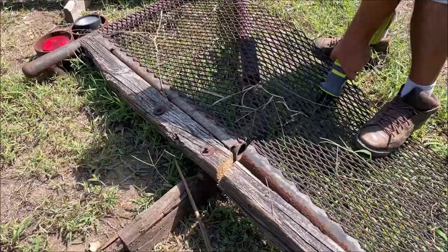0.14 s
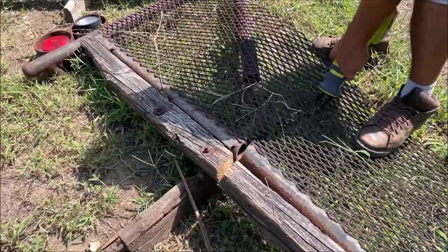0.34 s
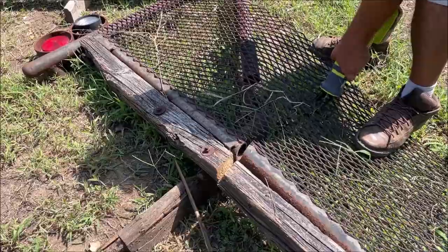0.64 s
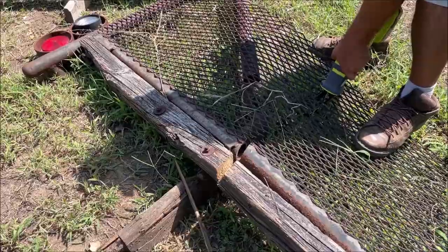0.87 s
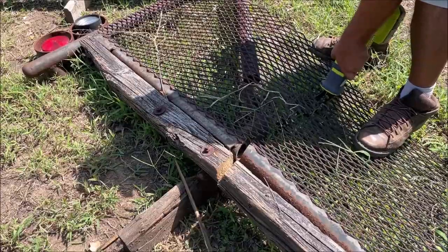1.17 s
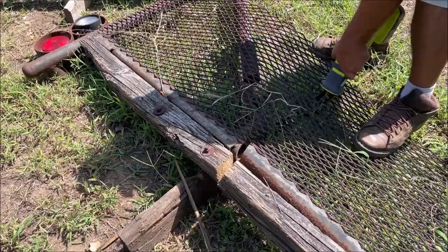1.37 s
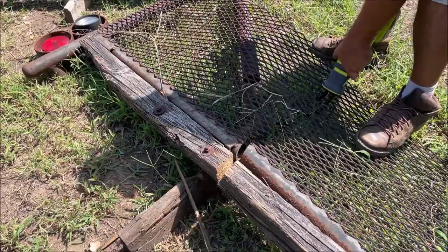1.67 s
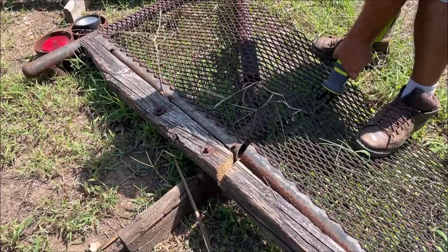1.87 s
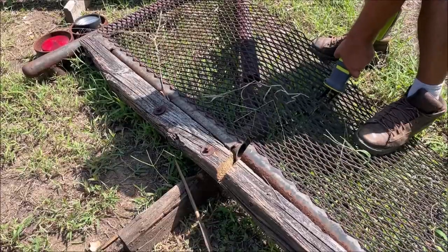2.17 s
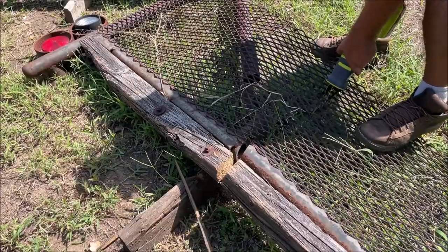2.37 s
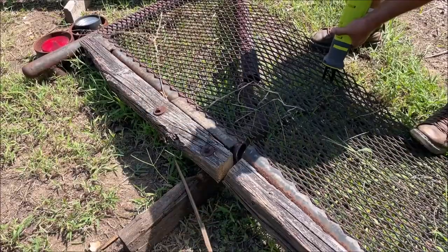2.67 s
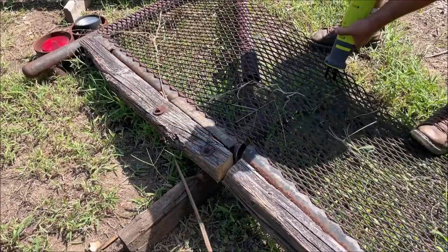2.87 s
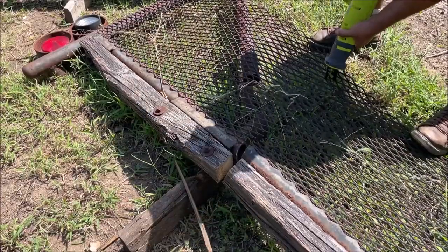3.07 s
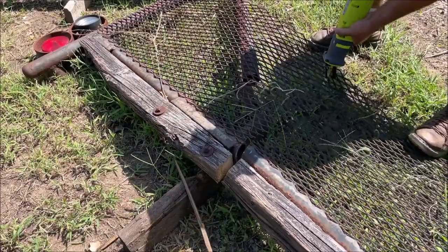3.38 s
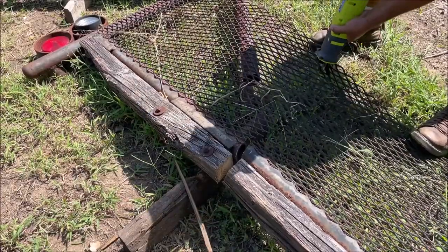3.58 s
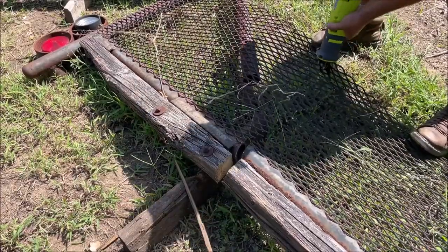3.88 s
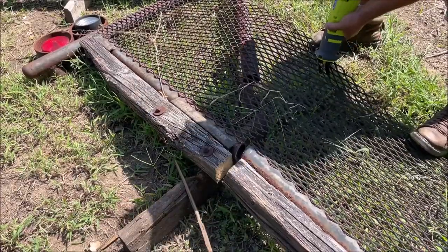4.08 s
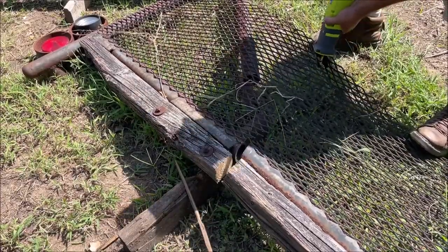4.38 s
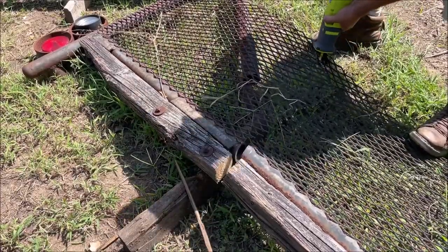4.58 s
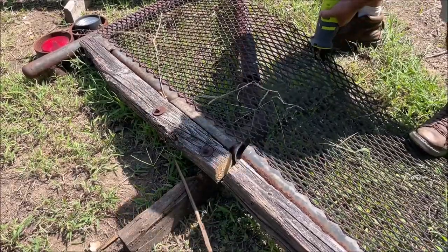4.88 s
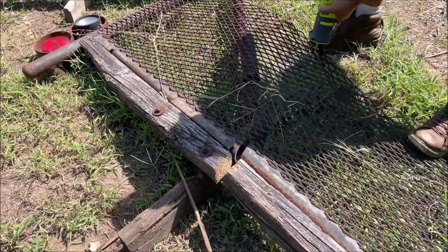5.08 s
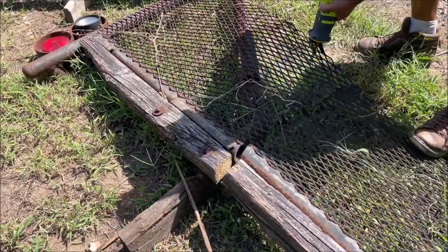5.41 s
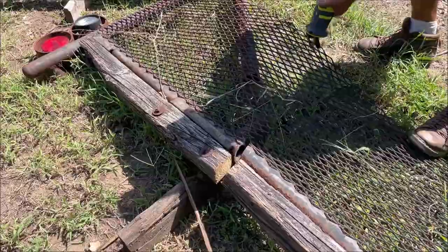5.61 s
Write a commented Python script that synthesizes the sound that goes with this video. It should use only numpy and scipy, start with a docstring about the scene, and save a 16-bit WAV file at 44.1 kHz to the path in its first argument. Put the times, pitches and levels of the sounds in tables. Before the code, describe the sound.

Harsh buzzing power saw cutting a metal gate outdoors, with ringing pipe barks, two short gaps, a clacking stumble and wavering blade squeals.

```python
"""Reciprocating saw on a steel gate

A cordless saw cuts a steel pipe of a mesh gate: filtered noise impacts rasp in time with the strokes.
The pipe barks in short sagging tones, the blade squeals in wavering tones, the shoe clacks in noise bursts.
Stroke harmonics and ringing resonances make the gate hum, rattle and bump on its timber, over faint air.
The first two stretches end in a run-down; after a hard bite and a clacking stumble it cuts on faster."""
import sys
import numpy as np
from scipy import signal
from scipy.fft import rfft, irfft
from scipy.io import wavfile
from scipy.ndimage import uniform_filter1d

SR = 44100
rng = np.random.default_rng(int(sys.argv[2]) if len(sys.argv) > 2 else 0)


def wrap_up_sound(samples):
    """Save the sound to the file named by the first command line argument, as 16-bit audio."""
    columns = np.atleast_2d(samples).T
    # keep every value between -1 and 1, then stretch to whole-number steps
    tamed = np.clip(columns, -1, 1)
    steps = np.round(tamed * 32767).astype(np.int16)
    wavfile.write(sys.argv[1], SR, steps)


N = 253519

T = np.arange(N) / SR  # s
FREQ = np.maximum(np.arange(N // 2 + 1) * SR / N, 1)  # Hz, kept above zero for the logarithms

# run-down after a stretch of sawing: time constant of the speed, then falls in level
COAST_S, RASP_FALL_DB_PER_S, GATE_FALL_DB_PER_S, GRIT_FALL_DB_PER_S = .3, 165, 111, 40
# fine grit and pipe ring relative to the rasp, low shaking relative to the rattle
GRIT_DB, RING_DB, SHAKE_DB = -7, -1, -8
# a bound blade rasps and rings more and holds the gate still: width of each strain, then dB per unit of it
STRAIN_S, STRAIN_RASP_DB, STRAIN_RING_DB, STRAIN_GRIT_DB, STRAIN_SHAKE_DB = 0.026, 1.15, 4, 0.5, -3
RING_MAX_DB = -30.5  # cap on the scraping's drive of the pipe, before strain adds to it


# One curve per stretch of sawing, the second coming back abruptly:
# [t/s, feed pressure as rasp level/dB, shaking of the gate level/dB]
STRETCHES = [
    [(0, -30, -29), (.48, -26.5, -34), (.68, -30.5, -35.5), (.95, -32, -37.5), (1.15, -30.5, -37),
     (1.45, -29.5, -39.5), (1.87, -30.5, -32), (2.05, -26, -28.5), (2.13, -30.5, -32), (2.27, -27, -31.5)],
    [(2.581, -33.5, -38), (2.75, -33, -37), (2.87, -25, -28.5), (3.03, -25.5, -30), (3.205, -24, -28.5)],
    [(3.3, -37, -35), (3.375, -41, -41), (3.48, -38, -35)],
    [(3.486, -33, -31.5), (3.61, -35, -36), (3.76, -27, -34.5), (3.95, -31.5, -34), (4.15, -28, -34.5),
     (4.23, -32, -36), (4.33, -28, -37.5), (4.66, -32, -35.5), (4.8, -29, -34.5), (5, -29, -37),
     (5.11, -31.5, -35.5), (5.53, -27, -34), (5.75, -32, -36)],
]


def sawing():
    """Rasp level, gate level and seconds of coasting; each stretch takes over from the one before."""
    state = np.zeros((3, N))
    for k, stretch in enumerate(STRETCHES):
        rasp_db, gate_db = curve(stretch)
        coast = np.maximum(T - stretch[-1][0], 0)
        rasp_db = rasp_db - RASP_FALL_DB_PER_S * coast
        gate_db = gate_db - GATE_FALL_DB_PER_S * coast
        begun = (T >= stretch[0][0]) | (k == 0)
        state = np.where(begun, [rasp_db, gate_db, coast], state)
    return state


# Stroke rate under power: [t/s, f/Hz (strokes per second)]
SPEED = [(0, 32.3), (.4, 33.2), (.65, 33.6), (.8, 34.2), (.93, 38.7), (1.2, 39.2), (1.31, 41.7),
         (1.54, 41.8), (1.69, 35), (1.85, 33.5), (1.915, 30.5), (1.97, 33.7), (2.05, 34), (2.27, 33.8),
         (2.58, 44), (2.77, 44), (2.92, 38), (3.17, 40.5), (3.35, 22), (3.5, 32), (3.75, 43.1),
         (4.15, 43.6), (5.1, 43.4), (5.4, 41.8), (5.75, 42)]


def stroke_rate(coast):
    """Strokes per second: the powered rate, spinning down exponentially while the saw coasts."""
    return curve(SPEED)[0] * np.exp(-coast / COAST_S)


def crank(motor, catches):
    """Stroke count of the blade, which slips against the motor so that its teeth catch at whole numbers."""
    times = catches[:, 0]
    slip = np.unwrap(2 * np.pi * (np.interp(times, T, motor) % 1)) / (2 * np.pi)
    return motor - np.interp(T, times, slip)


def bite(turns, pull_db, return_db, uneven_db, lead=0.244):
    """Force of the teeth: a level ramp per stroke and half stroke, falling for positive dB, else rising."""
    pull = (turns + lead) % 1
    either_way = (2 * (turns + lead)) % 1
    force_db = uniform_filter1d(-pull_db * pull - return_db * either_way, size=44)  # 1 ms smoothing
    return unit(undb(force_db + uneven_db * walk(110)))


def strain(catches, full_db=-12):
    """How hard the blade is bound: it builds up where strong catches crowd together, 0 when it runs free."""
    return sum(undb(db - full_db) * swell(s, STRAIN_S) for s, db, hz in catches)


# Tooth noise, relative spectrum: [f/Hz, level per Hz/dB]
RASP = [(700, -25), (1100, -7), (1700, -2), (2100, -2.8), (3000, -5), (3900, -6.8), (4700, -7),
        (6100, -10.8), (7400, -6.3), (9200, -11.2), (10500, -8.8), (13000, -14.5), (15600, -17)]
# Higher resonances of the pipe wall: [f/Hz, width/Hz, level/dB]
WALL = [(1875, 97, 3), (2180, 110, -32), (2319, 31, 8), (2465, 14, 8.5), (2820, 26, -26), (2890, 20, 9.5),
        (3110, 93, 5), (3267, 40, 3.5), (3574, 120, -2.5), (3776, 67, -1.5), (3880, 150, -2.5),
        (4520, 19, 9.5), (4620, 430, -2), (4876, 29, 6.5), (5180, 43, 2), (5300, 25, -18)]


def teeth(turns, rasp_db, grit_db):
    """Teeth tear chips from the steel and ring the wall; sharper contact adds fine grit at the top."""
    chips = colour(steel(impacts(spread=0.69)), RASP)
    wall = resonate(impacts(spread=3.1), WALL)
    snapping = chipping(per_s=260, decay_s=0.0023, burst_db=-2.0)
    rasp = unit(chips + undb(-6.0) * wall) * snapping
    grit = irfft(rfft(rasp) / (1 + (8000 / FREQ) ** 8), N)  # the part above about 8 kHz
    body_bite = bite(turns, pull_db=-0.7, return_db=-2.0, uneven_db=0.37)
    grit_bite = bite(turns, pull_db=2.5, return_db=2.0, uneven_db=1.4)
    body = (rasp - grit) * body_bite * undb(rasp_db + 0.63)
    return body + unit(grit) * grit_bite * undb(rasp_db + grit_db + 3.0)


def chipping(per_s, decay_s, burst_db):
    """Chips snap off at random: each lifts the noise at once and dies away in a few milliseconds."""
    snaps = (rng.random(N) < per_s / SR) * rng.exponential(size=N)
    bursts = signal.lfilter([1], [1, -np.exp(-1 / (decay_s * SR))], snaps)
    return unit(np.sqrt(1 + undb(burst_db) ** 2 * bursts))


# The teeth catch and the pipe barks: [t/s, peak level/dB, f/Hz]
BARKS = [(.005, -14.5, 1265), (.036, -12, 1212), (.068, -11, 1256), (.098, -17.5, 1261), (.128, -15, 1204),
         (0.159, -18, 1278), (0.192, -18.5, 1295), (.225, -14, 1238), (.254, -12, 1219), (.284, -12, 1270),
         (.314, -12, 1179), (0.343, -9.5, 1170), (.373, -13, 1201), (.404, -15, 1240), (.434, -11.5, 1196),
         (.465, -15, 1136), (.493, -13, 1200), (.526, -10.5, 1248), (.561, -18, 1244), (.590, -17.5, 1150),
         (.621, -16.5, 1174), (.742, -18, 1257), (0.772, -16, 1260), (.801, -17.5, 1275),
         (0.831, -20, 1256), (.860, -18.5, 1221), (.887, -15.5, 1250), (.991, -15, 1249),
         (1.149, -20, 1290), (1.200, -18, 1247), (1.223, -16, 1162), (1.249, -15, 1282), (1.297, -17, 1213),
         (1.321, -13.5, 1230), (1.346, -14, 1213), (1.37, -13.5, 1182), (1.44, -15, 1260),
         (1.463, -12.5, 1225), (1.535, -13, 1227), (1.560, -11.5, 1240), (1.585, -11, 1228),
         (1.747, -16.5, 1240), (1.824, -18, 1304), (1.900, -12, 1250), (1.933, -14, 1270),
         (1.962, -17, 1315), (2.148, -19, 1220), (2.792, -21, 1250), (2.974, -12.5, 1233),
         (3.002, -15.5, 1229), (3.028, -12.5, 1228), (3.051, -13, 1248), (3.101, -14, 1180),
         (3.125, -10.5, 1180), (3.152, -16.5, 1273), (4.467, -20, 1237), (4.564, -17.5, 1256),
         (4.587, -17, 1285), (4.716, -17.5, 1253), (4.814, -19, 1266), (4.835, -15, 1110),
         (4.928, -18.5, 1245), (4.953, -17, 1314), (4.975, -16, 1236), (4.998, -12, 1234),
         (5.022, -17, 1295), (5.045, -19, 1147), (5.496, -19, 1240), (5.576, -13.5, 1336)]


def barks(catches, width_s=0.0034, skirt_s=.008, skirt_db=-17, waver_hz=20, sag_hz_per_s=3000,
          overtone_db=-19, rebound_s=0.013, rebound_db=-20):
    """Caught teeth chatter at the pipe's main resonance, sag in pitch, break free and catch again lightly."""
    out, waver = np.zeros(N), waver_hz * walk(400)
    for (s, db, hz), start in zip(catches, rng.random(len(catches))):
        near = np.abs(T - s) < 3 * skirt_s
        age = T[near] - s
        pitch = hz - sag_hz_per_s * age + waver[near]
        phase = 2 * np.pi * (start + np.cumsum(pitch) / SR)
        shape = np.exp(-(age / width_s) ** 2) + undb(skirt_db) * np.exp(-(age / skirt_s) ** 2)
        shape = shape + undb(rebound_db) * np.exp(-((age - rebound_s) / width_s) ** 2)
        tone = np.sin(phase) + undb(overtone_db) * np.sin(2 * phase)
        out[near] += undb(db) * shape / shape.max() * tone
    return with_scatter(out, 0.00394)


# Main resonances of the pipe: [f/Hz, width/Hz, level/dB]
PIPE = [(1103, 140, -2), (1219, 69, 0), (1278, 32, 5.5), (1340, 96, 0), (1463, 148, -3)]
# Leaning on the saw makes a lower mode groan: [t/s, half length/s, level/dB]
GROANS = [(.36, 0.065, -22), (.475, .045, -22.5), (0.598, .03, -29.5)]
# Modes that groan: [f/Hz, width/Hz, level/dB]
GROAN_MODES = [(890, 60, -20), (1080, 34, 7)]


def pipe(turns, catches, ring_db):
    """Scraping keeps the pipe ringing and groaning, except as the teeth hang before a bark and during it."""
    hanging_db = -10 * around_catches(catches, delay_s=-0.003, width_s=0.007)
    scraping = impacts(spread=2.6) * bite(turns, pull_db=5, return_db=-0.5, uneven_db=0.94)
    ring = resonate(scraping, PIPE) * undb(ring_db)
    return (ring + judder(turns, GROANS, GROAN_MODES)) * undb(hanging_db)


def judder(turns, spells, modes):
    """Under a heavy feed the teeth skip in rough bursts, strongest once a stroke, and ring a set of modes."""
    skipping = impacts(spread=4.5) * bite(turns, pull_db=6, return_db=2, uneven_db=0.0)
    return resonate(skipping, modes) * sum(undb(db) * swell(s, half) for s, half, db in spells)


# Spells of skipping teeth: [t/s, half length/s, level/dB]
CHATTERS = [(0.484, 0.079, -31), (1.233, .025, -33.5), (1.352, .04, -31.5), (1.57, 0.062, -34),
            (3.08, .09, -47), (5.01, .06, -38.5)]
# Modes of the pipe wall that chatter: [f/Hz, width/Hz, level/dB]
CHATTER_MODES = [(2030, 50, -10), (2160, 69, 2.5), (2323, 29, -2), (2540, 50, 3), (2690, 50, -2.5)]


def chatter(turns):
    """The teeth skip on the pipe wall and ring its modes."""
    return judder(turns, CHATTERS, CHATTER_MODES)


def blade(turns, rasp_db, coast, swing_hz=55, waver_hz=52):
    """The thin blade squeals against the sides of the slot; its pitch swings with every stroke."""
    db, hz = rubbing(rasp_db)
    pitch = hz + swing_hz * np.cos(2 * np.pi * turns) + waver_hz * walk(500)
    phase = 2 * np.pi * np.cumsum(pitch) / SR
    tone = np.sin(phase) * bite(turns, pull_db=-0.5, return_db=2.5, uneven_db=1.5)
    singing = steel(with_scatter(tone, .005), t60_s=.04, ring_db=-6)
    scraping = resonate(impacts(spread=2.4), [(1615, 240, 0)])
    # light rubbing only scrapes; harder rubbing locks into a tone, half and half at -37 dB
    locked = 1 / (1 + undb(-2 * (db + 37.0)))
    rub = singing * np.sqrt(locked) + scraping * np.sqrt(1 - locked)
    return rub * undb(db + 4.0 - RASP_FALL_DB_PER_S * coast)


# The blade rubs the side of the slot: [t/s, half length/s, f/Hz, level/dB (before the blade's make-up gain)]
SQUEALS = [(1.045, 0.13, 1680, -35.5), (1.9, 0.21, 1628, -34), (2.706, .15, 1615, -40.5),
           (4.067, 0.12, 1586, -37.5), (4.328, 0.085, 1590, -28.5), (4.471, 0.12, 1557, -32),
           (4.774, .08, 1743, -35.5), (5.314, 0.13, 1617, -31), (5.483, 0.099, 1623, -26.5)]
RUB_HZ, RUB_DB = 1625, -12  # light rubbing between squeals; drive relative to the rasp


def rubbing(rasp_db):
    """Level and pitch of the blade's rubbing: it follows the feed, and swells in each squeal."""
    levels = [undb(rasp_db + RUB_DB)] + [undb(db) * swell(s, half) for s, half, hz, db in SQUEALS]
    powers = np.array(levels) ** 2
    pitches = np.array([RUB_HZ] + [hz for s, half, hz, db in SQUEALS])
    total = powers.sum(axis=0)
    return 10 * np.log10(total), pitches @ powers / total


# Short squeaks of the blade in the slot: [t/s, half length/s, f/Hz, glide/(Hz/s), level/dB]
SQUEAKS = [(2.985, .025, 2497, -1.5, -30), (3.02, .016, 2928, 2, -33), (3.05, .018, 2510, 0, -34),
           (3.095, .026, 2895, -1000, -28.5), (3.13, .04, 2360, -1200, -29.5),
           (3.183, 0.015, 3240, -0.5, -26.5), (3.185, 0.014, 4478, 0, -28), (3.2, .025, 3090, 1, -40),
           (3.455, 0.02, 3270, 2.5, -41), (3.557, .04, 3190, 499.5, -41), (3.61, .04, 3300, 1200, -35.5),
           (4.33, .06, 2910, -0.5, -31), (4.43, 0.015, 2890, 0, -30), (4.514, 0.09, 2920, 5, -43),
           (5.45, .2, 2995, 0, -41)]


def squeaks(turns, waver_hz=32, swing_hz=20):
    """Brief higher squeaks where the blade binds, throbbing with the stroke, some gliding in pitch."""
    out = 0
    for s, half, hz, glide, db in SQUEAKS:
        centre = hz + glide * np.clip(T - s, -2 * half, 2 * half)
        pitch = centre + swing_hz * np.cos(2 * np.pi * turns) + waver_hz * walk(600)
        phase = 2 * np.pi * np.cumsum(pitch) / SR
        out = out + np.sqrt(2) * np.sin(phase) * undb(db) * swell(s, half)
    out = out * bite(turns, pull_db=3, return_db=5, uneven_db=2)
    return with_scatter(out, 0.00268)


# The shoe strikes the steel: [t/s, jangle level/dB (before its trim), jangle t60/s, crack level/dB]
CLACKS = [(1.116, -28, .26, -20.5), (2.18, -23, .07, -21), (2.582, -42, .042, -33.5),
          (2.833, -17.5, 0.07, -19), (3.022, -14.5, 0.072, -16), (3.342, -31, 0.12, -25),
          (3.393, -30, 0.22, -20), (3.453, -30, 0.12, -23), (3.484, -21.5, 0.34, -24),
          (3.512, -39, 0.052, -25), (3.542, -45, .06, -23.5), (4.712, -29, 0.19, -24)]
CRACK_T60_S = .02


def clacks(ring_db=-2, zing_db=-11, zing_t60_s=0.1):
    """The shoe strikes the pipe with a bright crack; the blade zings and the mesh jangles after it."""
    ring = sum(undb(db) * decay(s, t60) for s, db, t60, crack_db in CLACKS)
    crack = sum(undb(crack_db) * decay(s, CRACK_T60_S) for s, db, t60, crack_db in CLACKS)
    zing = sum(undb(crack_db + zing_db) * decay(s, zing_t60_s) for s, db, t60, crack_db in CLACKS)
    jangle = colour(steel(impacts(spread=2.4)), RASP)
    snap = colour(impacts(spread=1.7), [(2000, -4), (6000, -2), (11000, 8.0), (16000, 1.5)])
    blade_ring = resonate(impacts(spread=1.0), [(10780, 390, 0)])
    return jangle * ring * undb(ring_db) + snap * crack + blade_ring * zing


# Low resonances of the gate on its timber: [f/Hz, width/Hz, level/dB]
FRAME = [(55, 20, -14), (88.2, 8.1, -2.5), (102.6, 15, -0.5), (134.7, 15, -5.5), (168, 26, -3.5),
         (203.3, 23, 0), (232, 17, 2.5), (251, 25, -0.5)]
# Resonances of the steel mesh: [f/Hz, width/Hz, level/dB]
MESH = [(280.7, 22, -1.5), (339.2, 14.4, -2), (379, 32, -2.5), (447.6, 28.6, 2), (509, 46, 0),
        (598.6, 42.4, 3), (672, 48, 2), (736, 33, -1), (799, 30.4, 3), (930, 57, -2)]


def gate(motor, turns, rattle_db, shake_db):
    """Each stroke jolts the gate into a drone of stroke harmonics, and the loose mesh rattles."""
    strokes = np.diff(np.floor(motor), prepend=np.floor(motor[0]))  # one click per motor turn
    jolts = unit(strokes * undb(1.6 * walk(40)))
    shake = resonate(undb(-2.5) * jolts + impacts(spread=2.7), FRAME)
    loose = impacts(spread=2.63) * bite(turns, pull_db=-2.0, return_db=5, uneven_db=0.97)
    rattle = resonate(undb(-8.0) * steel(jolts, t60_s=0.14, ring_db=15.5) + loose, MESH)
    return shake * undb(shake_db - 1.0) + rattle * undb(rattle_db - 0.6)


# The gate bumps on its timber and shudders: [t/s, level/dB, t60/s]
BUMPS = [(.61, -30, 0.42), (1.101, -31.5, 0.58), (1.709, -28, 0.31), (1.85, -26.5, .23), (2.143, -39, .18),
         (3.485, -34, 0.37), (3.75, -32, .32), (4.601, -29.5, 0.14)]
BUMP_ATTACK_S = 0.01


def bumps():
    """The gate rocks against the timber: frame and mesh shudder together for a moment."""
    force = 0
    for s, db, t60 in BUMPS:
        attack = np.clip((T - s) / BUMP_ATTACK_S, 0, 1)
        force = force + undb(db) * decay(s, t60) * attack
    shudder = resonate(impacts(spread=3.1), FRAME + MESH)
    return colour(shudder, [(90, -7.0), (230, 1.5), (450, 0), (900, -8)]) * force


# A harmonic of the stroke meets a gate resonance and hums: [t/s, half length/s, resonance f/Hz, level/dB]
HUMS = [(.08, .2, 165, -47.5), (0.097, 0.19, 228, -49), (.1, 0.22, 295, -57), (0.097, 0.17, 195, -52),
        (.42, 0.11, 99, -50), (.42, 0.13, 199, -44), (.43, 0.12, 166, -47.5), (.39, 0.11, 332, -48),
        (.72, 0.13, 169, -50), (.78, 0.12, 102, -46), (1.088, 0.19, 195, -42.5), (1.03, 0.11, 387, -46.5),
        (1.12, 0.16, 275, -46.5), (1.195, 0.089, 465, -40), (1.35, .13, 125, -56.5),
        (1.42, 0.24, 336, -51.5), (1.47, .22, 168, -46.5), (1.445, .15, 672, -47.5),
        (1.534, 0.13, 210, -47), (2.008, 0.26, 102, -45.5), (2.766, 0.073, 176, -47),
        (3.016, 0.092, 231, -41), (3.56, 0.11, 102, -54), (3.9, .42, 87, -53.5), (3.953, 0.25, 217, -51.5),
        (4.455, 0.081, 174, -53), (4.883, 0.21, 608, -45.5), (5.02, 0.29, 130, -53),
        (5.503, 0.12, 250, -47), (5.72, 0.087, 100, -51)]
HUM_DB = -55  # the faint drone of stroke harmonics 2 to 8 together


def drone(motor, speed, coast, waver_db=2.0):
    """The saw's swinging mass drones faintly; the harmonic nearest a gate resonance swells into a hum."""
    starts = rng.random(size=32)

    def line(order):
        """One stroke harmonic at rms 1."""
        return np.sqrt(2) * np.sin(2 * np.pi * (order * motor + starts[order]))

    out = unit(sum(line(order) for order in range(2, 9))) * undb(HUM_DB)
    for s, half, hz, db in HUMS:
        nearest = round(hz / np.interp(s, T, speed))
        out = out + line(nearest) * swell(s, half) * undb(db + waver_db * walk(11))
    return out * np.exp(-2 * coast / COAST_S)


def air():
    """Faint outdoor air: steady noise, mostly low."""
    noise = rng.standard_normal((2, N))
    return colour(noise, [(30, -18), (55, -3.0), (200, -19), (1500, -29), (12000, -53)]) * undb(-55.0)


# The two microphone ports: [f/Hz, left minus right level/dB, left lead/rad, unrelated share/(0-1)]
PORTS = [(100, 0, 0, .01), (300, -.2, 0, .05), (700, .6, 0, .08), (1250, -1, -.2, .045),
         (1700, -1, -.5, .1), (2300, 3.5, -.3, .19), (3100, 4, .5, .17), (4100, 3, -.1, .16),
         (4900, 6, .5, .16), (5600, 3.5, .2, .25), (6400, 1.5, -.7, .19), (7700, 0, -2.7, .07),
         (8300, 0, -3.15, .002), (9000, 0, -3.6, .12), (9700, 0, -4.6, .16), (10800, 0, -5.9, .07),
         (11700, 0, -6.3, .003), (12400, 0, -6.8, .15), (13300, 0, -8, .21), (14000, 0, -8.9, .14),
         (14600, 0, -9.4, .005)]


def ports(sound):
    """Two ports hear direct sound with a level and phase difference, and scattered sound in opposition."""
    pan_db, lead, share = over_hz(PORTS)
    share = np.clip(share, 0, 1)
    direct, scattered = rfft(sound) * np.sqrt([1 - share, share])
    tilt = undb(pan_db / 2) * np.exp(.5j * lead)  # half the difference to each side
    return irfft(np.array([(direct + scattered) * tilt, (direct - scattered) / tilt]), N)


def impacts(spread):
    """Dense tiny impacts of uneven size; row 0 arrives directly, row 1 scattered by the surroundings."""
    return rng.standard_normal((2, N)) * undb(spread * walk(1400))


def with_scatter(x, delay_s):
    """Row 0 direct, row 1 a delayed copy as the scattered sound."""
    return np.array([x, np.roll(x, int(delay_s * SR))])


def steel(x, t60_s=0.041, ring_db=-3):
    """Countless close modes of the welded gate give every impact a short jangle, even in colour overall."""
    age = T[:N // 32]
    tail = rng.standard_normal(len(age)) * undb(-60 * age / t60_s)
    response = 1 + undb(ring_db) * rfft(tail / np.linalg.norm(tail), N)
    broad = np.sqrt(uniform_filter1d(np.abs(response) ** 2, size=1500))
    return unit(irfft(rfft(x) * response / broad, N))


def resonate(x, modes):
    """Ring a set of (Hz, width, dB) resonances, with little radiated below the first."""
    response = 0
    for k, (hz, width, db) in enumerate(modes):
        mode = undb(db) / (1 + 1j * (FREQ ** 2 - hz ** 2) / (FREQ * width))
        response = response + (-1) ** k * mode  # alternate signs
    return unit(irfft(rfft(x) * response * np.minimum(FREQ / modes[0][0], 1) ** 2, N))


def colour(x, points):
    """Give x a spectrum that falls away steeply below its first point."""
    low_cut = np.minimum(FREQ / points[0][0], 1) ** 2
    return unit(irfft(rfft(x) * undb(over_hz(points)[0]) * low_cut, N))


def around_catches(catches, delay_s, width_s):
    """A 0-1 swell near each moment when the teeth catch."""
    times = catches[:, 0] + delay_s
    nearest = times[np.searchsorted((times[1:] + times[:-1]) / 2, T)]
    return swell(nearest, width_s)


def swell(s, width_s):
    """A 0-1 bell in time around s."""
    return np.exp(-np.minimum(((T - s) / width_s) ** 2, 50))


def decay(s, t60_s):
    """A gain that jumps to 1 at s and dies away."""
    return undb(-60 * np.maximum(T - s, 0) / t60_s) * (T >= s)


def walk(rate):
    """Smooth chance with spread 1, changing rate times a second."""
    steps = rng.standard_normal(N // 16)
    return unit(np.interp(T * rate, np.arange(len(steps)), steps))


def curve(rows):
    """Columns of a table joined by straight lines in time."""
    s, *columns = np.transpose(rows)
    return [np.interp(T, s, c) for c in columns]


def over_hz(rows):
    """Columns of a table joined by straight lines over log frequency."""
    hz, *columns = np.transpose(rows)
    return [np.interp(np.log(FREQ), np.log(hz), c) for c in columns]


def undb(db):
    """Decibels to gain."""
    return 10 ** (np.asarray(db) / 20)


def unit(x):
    """Scale to rms 1."""
    return x / np.sqrt(np.mean(x ** 2))


def scene():
    """Speed and feed pressure drive the saw through one crank; faint outdoor air lies beneath."""
    rasp_db, gate_db, coast = sawing()
    speed = stroke_rate(coast)
    motor = np.cumsum(speed) / SR  # strokes so far
    catches = np.array(BARKS)
    turns, bound = crank(motor, catches), strain(catches)

    # caught teeth hang for a moment, then tear out a bigger chip
    hanging_db = -2.5 * around_catches(catches, delay_s=-0.0094, width_s=0.0032)
    tearing_db = 2 * around_catches(catches, delay_s=0.003, width_s=0.0032)
    tooth_db = rasp_db + STRAIN_RASP_DB * bound + tearing_db + hanging_db
    grit_db = GRIT_DB + STRAIN_GRIT_DB * bound - GRIT_FALL_DB_PER_S * coast
    ring_db = np.minimum(rasp_db + RING_DB, RING_MAX_DB) + STRAIN_RING_DB * bound
    shake_db = gate_db + SHAKE_DB + STRAIN_SHAKE_DB * bound

    cutting = teeth(turns, tooth_db, grit_db)
    ringing = barks(catches) + pipe(turns, catches, ring_db) + chatter(turns)
    squealing = blade(turns, rasp_db, coast) + squeaks(turns)
    shaking = gate(motor, turns, gate_db, shake_db) + bumps() + drone(motor, speed, coast)
    return ports(cutting + ringing + squealing + clacks() + shaking + air())


TOP_HZ = 15700


def record(dry):
    """A steep low-pass ends the sound just below 16 kHz."""
    return irfft(rfft(dry) / (1 + (FREQ / TOP_HZ) ** 300), N)


dry = scene()
out = record(dry)
wrap_up_sound(out)
```